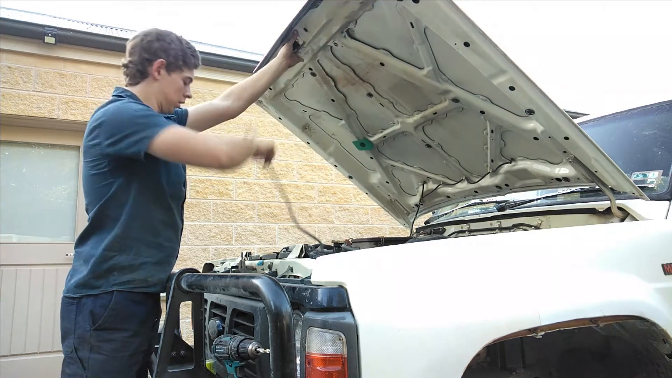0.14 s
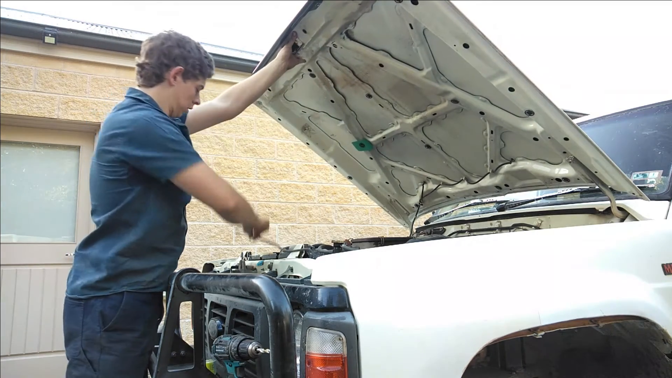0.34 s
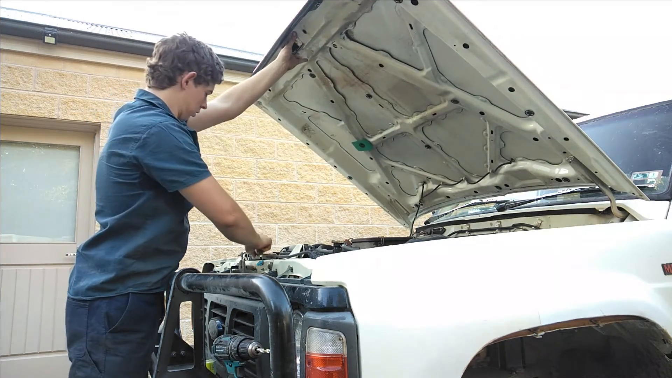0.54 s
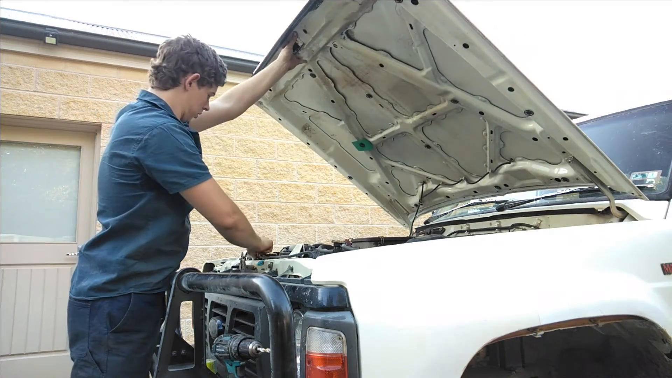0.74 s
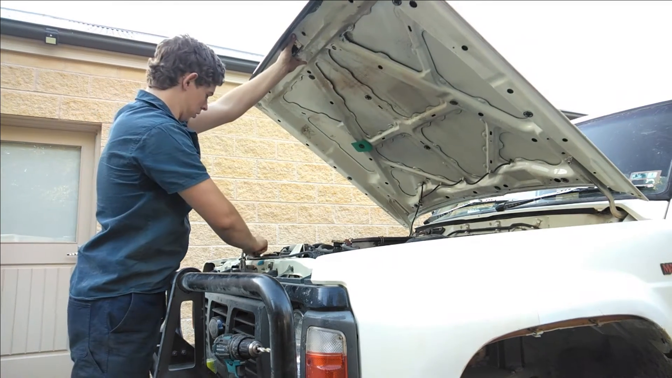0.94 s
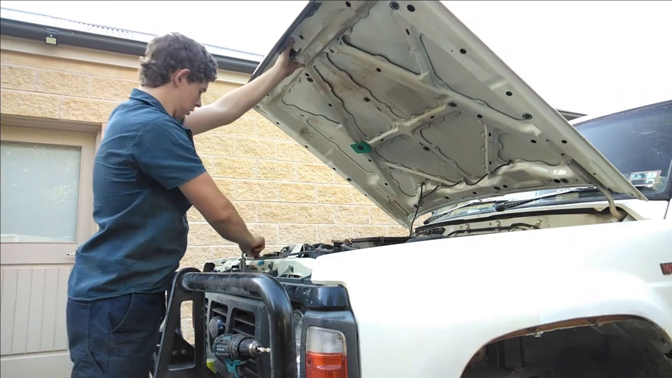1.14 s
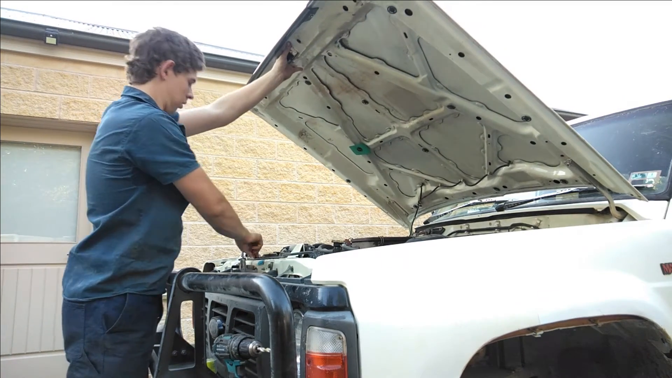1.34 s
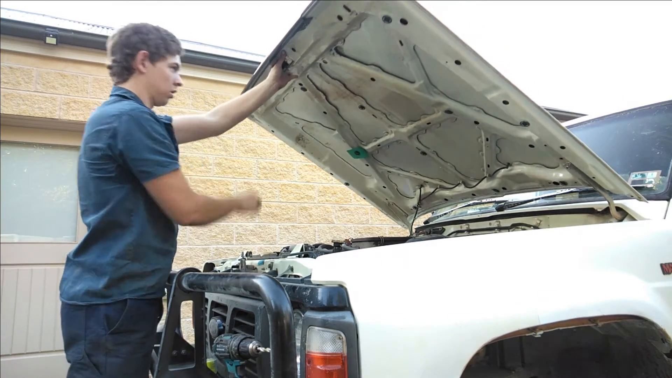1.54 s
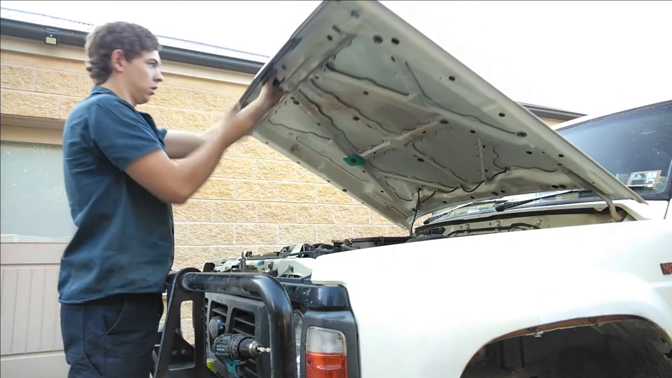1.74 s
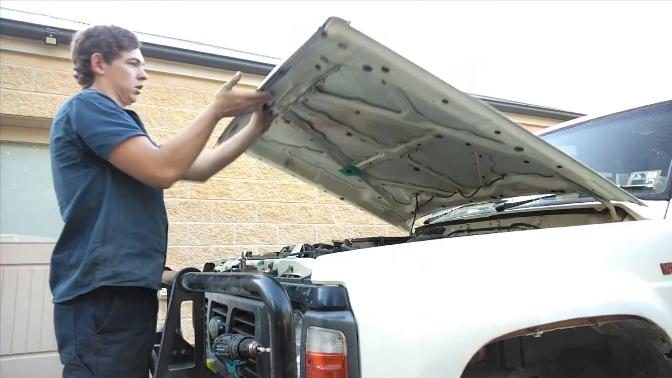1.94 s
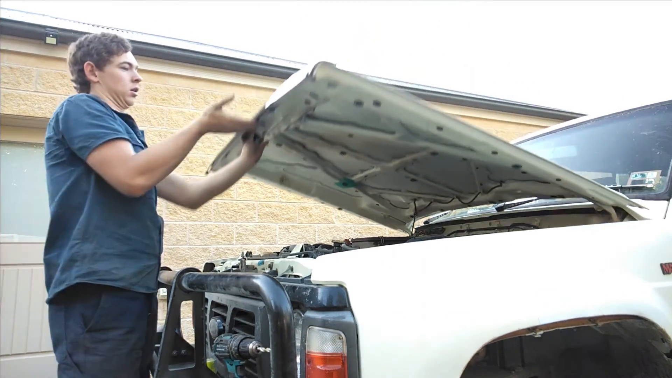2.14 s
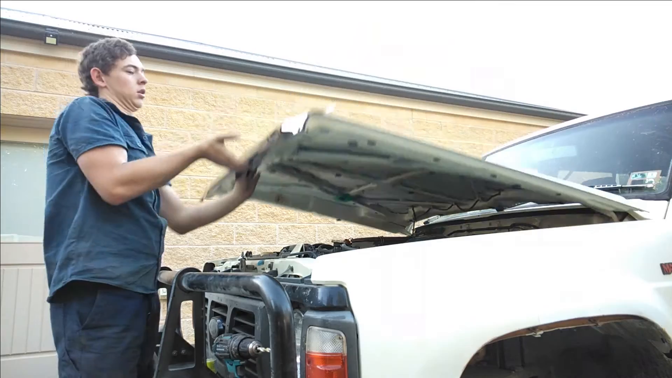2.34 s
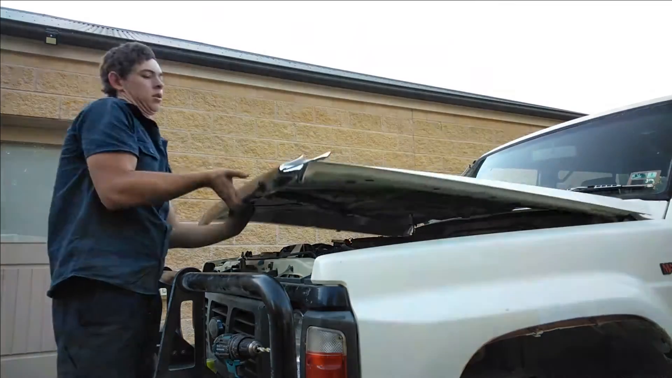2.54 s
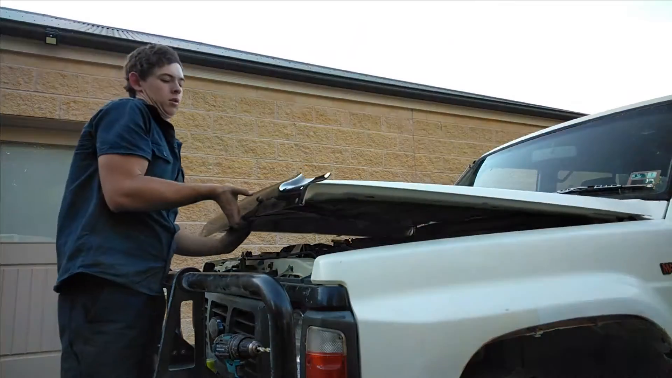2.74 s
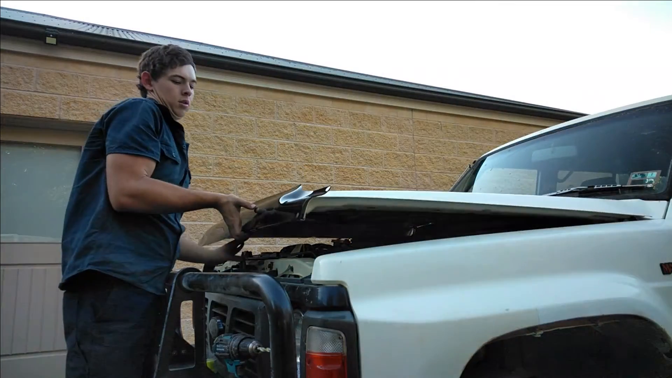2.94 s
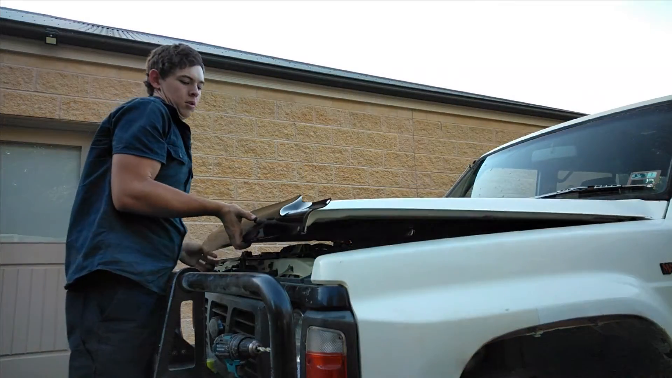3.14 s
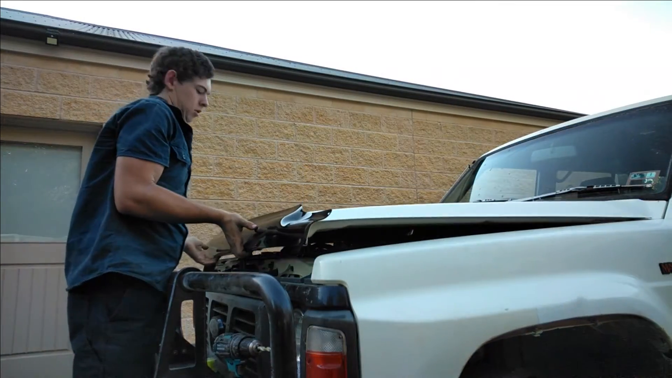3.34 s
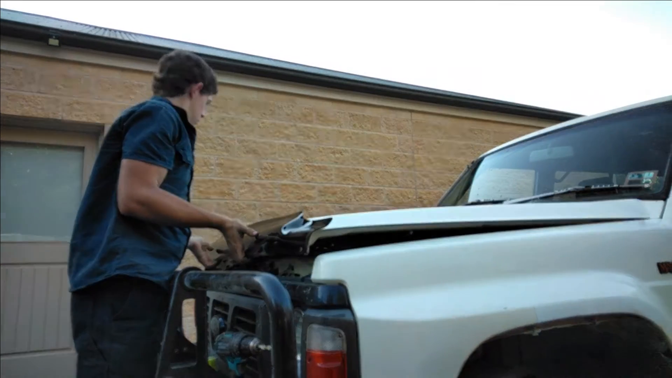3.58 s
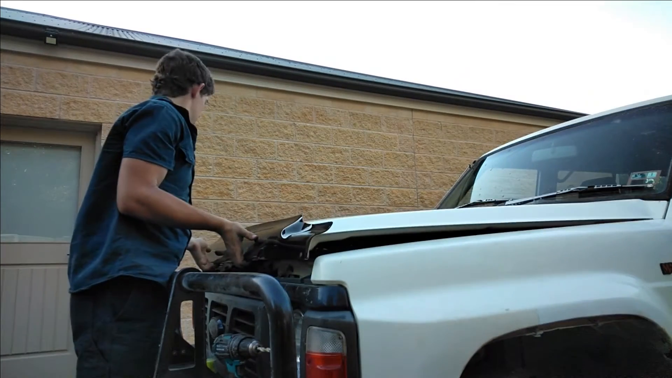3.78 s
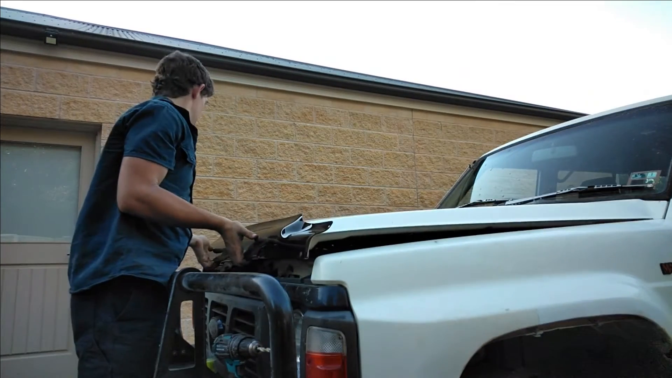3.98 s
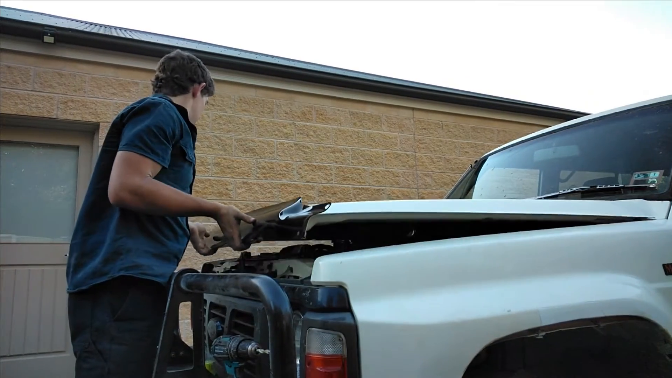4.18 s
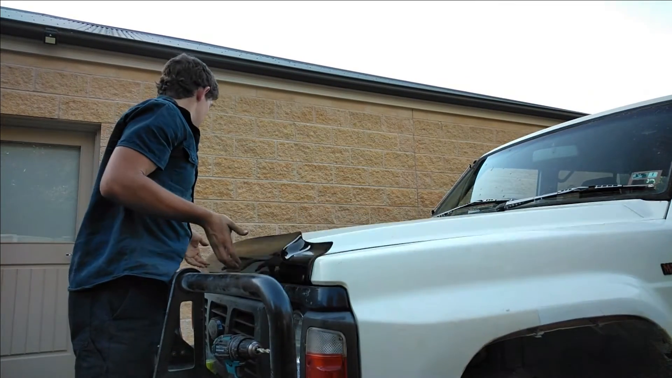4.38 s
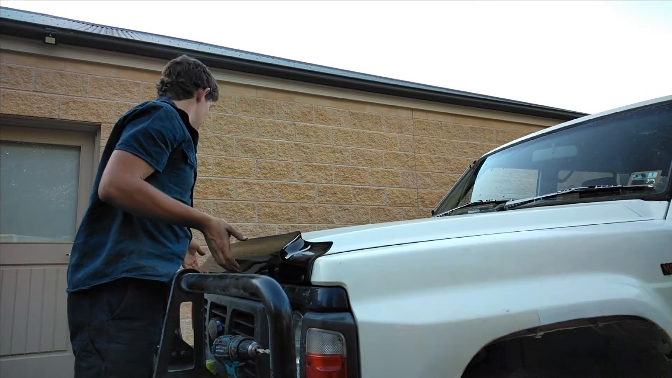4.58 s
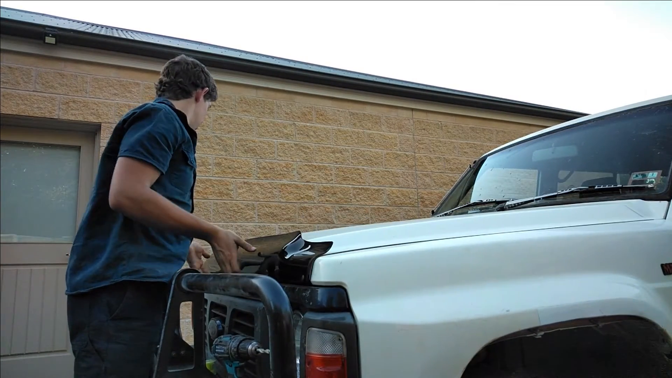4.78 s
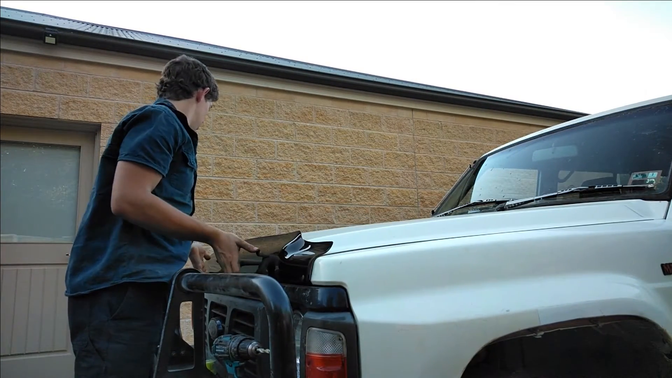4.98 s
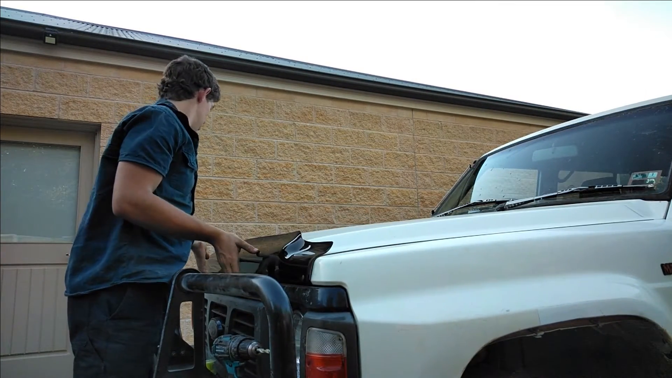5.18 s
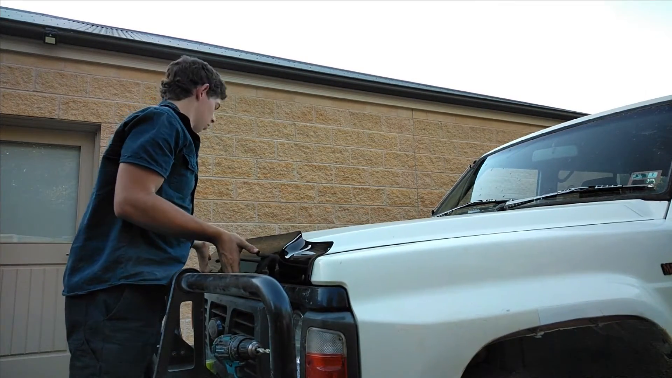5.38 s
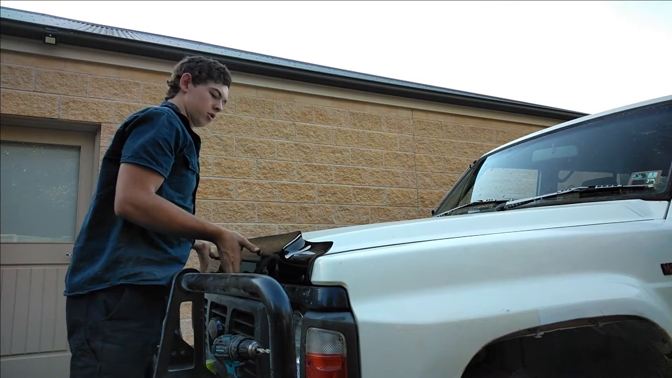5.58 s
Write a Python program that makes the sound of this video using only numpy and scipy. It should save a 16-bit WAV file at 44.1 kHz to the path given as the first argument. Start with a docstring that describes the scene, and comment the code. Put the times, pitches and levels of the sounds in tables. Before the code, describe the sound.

A metal prop rod snaps into its clip, then a steel car bonnet is lowered with light rattles and slammed shut outdoors.

```python
"""Steel bonnet shut on a driveway.

The prop rod folds down, squeaks in its pivot and snaps into its clip. The bonnet knocks on its hinges as
it is lowered and touches the catch, then is slammed: the striker clangs, the latch snaps, the panel booms.
Each blow is decaying noise (crowded modes) plus ringing sines (clear modes). Birds call far off over
quiet air; a brick wall, the garage door and the paving echo."""
import sys
import numpy as np
from scipy import signal
from scipy.fft import rfft, irfft
from scipy.io import wavfile
from scipy.ndimage import uniform_filter1d

SR = 44100
rng = np.random.default_rng(int(sys.argv[2]) if len(sys.argv) > 2 else 0)


def wav_record(signal):
    """Record a signal, one row per channel, as 16-bit PCM in the file named by sys.argv[1]."""
    frames = np.transpose(np.atleast_2d(signal))
    bounded = np.clip(frames, -1, 1)
    # unit amplitude maps onto the largest positive 16-bit level
    quanta = np.round(bounded * 32767).astype(np.int16)
    wavfile.write(sys.argv[1], SR, quanta)


N = 247401
TIME = np.arange(N) / SR


def from_db(db):
    return 10 ** (np.asarray(db) / 20)


def unit_rms(x):
    return x / np.sqrt(np.mean(x ** 2) + 1e-20)


def at_hz(points, hz):
    """Interpolate rows of (f/Hz, value) over log frequency."""
    known_hz, value = np.transpose(points)
    return np.interp(np.log(np.maximum(hz, 1)), np.log(known_hz), value)


def add(out, start_s, sound):
    at = round(start_s * SR)
    out[at:at + len(sound)] += sound[:N - at]


def coloured(white, colour):
    """Shape white noise at constant power."""
    hz = np.fft.rfftfreq(len(white), 1 / SR)
    return irfft(rfft(white) * unit_rms(from_db(at_hz(colour, hz))), len(white))


def crowded_modes(noise, decay, shelves=((1, 0), (SR, 0))):
    """Each band of the noise swells quickly and dies at its own rate."""
    t, hz = TIME[:len(noise)], np.fft.rfftfreq(len(noise), 1 / SR)
    spectrum = rfft(noise) * from_db(at_hz(shelves, hz))
    centres_hz = [row[0] for row in decay]
    out = 0
    for (centre_hz, t60_s), weights in zip(decay, np.eye(len(decay))):
        band = irfft(spectrum * at_hz(list(zip(centres_hz, weights)), hz), len(noise))
        attack = 1 - np.exp(-2 * t * min(centre_hz, SR / 20))
        out = out + band * attack * np.exp(-np.log(1000) * t / t60_s)
    return out


def mode(times_s, levels_db, hz, t60_s):
    """One resonance, rung by a click at each contact."""
    clicks = np.zeros(N)
    clicks[np.round(times_s * SR).astype(int)] = from_db(levels_db)
    r, w = np.exp(-np.log(1000) / (t60_s * SR)), 2 * np.pi * hz / SR
    return signal.lfilter([0, np.sin(w)], [1, -2 * r * np.cos(w), r * r], clicks + 1e-18)


def with_force(hits, bass_db, bass_per_softness):
    """Turn hardness (treble/dB) into a force spectrum: softer contacts last longer and gain bass."""
    blows = []
    for start_s, level_db, treble_db in hits:
        force = [(150, bass_db - bass_per_softness * treble_db), (450, 0), (1100, 0), (3800, treble_db)]
        blows.append((start_s, level_db, force))
    return blows


def struck(blows, colour, decay, shared_power, rise_s, crack_db, crack_s, size=32768):
    """Crowded modes of one steel part; its blows share some of them."""
    out, t = np.zeros(N), TIME[:size]
    shared = rng.standard_normal(size)
    # contact builds up, loudest before the blow spreads through the metal
    crack = (1 - np.exp(-t / rise_s)) * (1 + from_db(crack_db) * np.exp(-t / crack_s))
    for start_s, level_db, force in blows:
        white = np.sqrt(shared_power) * shared + np.sqrt(1 - shared_power) * rng.standard_normal(size)
        body = crowded_modes(coloured(white, colour), decay, force)
        add(out, start_s, from_db(level_db) * crack * body)
    return out


def clear_modes(blows, modes, drive_db, spread_db):
    """Each blow rings the part's clearest modes; neighbours swing opposite ways."""
    times_s, levels_db, forces = zip(*blows)
    force_db = np.array([at_hz(force, np.array(modes)[:, 0]) for force in forces])
    force_db += spread_db * rng.standard_normal(force_db.shape)
    out = np.zeros(N)
    for k, (hz, mode_db, t60_s) in enumerate(modes):
        strength_db = force_db[:, k] + levels_db + mode_db + drive_db
        out += (-1) ** k * mode(np.array(times_s), strength_db, hz, t60_s)
    return out


# outdoor background spectrum: f/Hz, relative density/dB
AIR_COLOUR = [(20, -13.5), (50, 0.5), (80, -12.5), (140, -13.5), (220, -17.5), (330, -21), (480, -15.5),
              (800, -19), (1400, -23.5), (2200, -27.5), (3800, -32), (6500, -32), (10000, -34.5),
              (15500, -32.5)]


def air(level_db=-52.5):
    """Steady, quiet outdoor noise."""
    return from_db(level_db) * coloured(rng.standard_normal(N), AIR_COLOUR)


# echo spectrum: f/Hz, relative level/dB
YARD_COLOUR = [(50, 0.5), (300, 5), (1500, -0.5), (3500, 1), (5000, 2), (6500, 4), (9000, 2.5), (15000, -6)]
# echo decay: f/Hz, t60/s
YARD_DECAY = [(100, 0.836), (500, 0.595), (2000, 0.803), (6500, 0.49), (13000, 0.34)]


def yard(x, delay_s=0.015):
    """Scattered echoes from wall, garage door and paving."""
    response = crowded_modes(coloured(rng.standard_normal(SR), YARD_COLOUR), YARD_DECAY)
    response /= np.sqrt(np.sum(response ** 2))
    out = np.zeros(N)
    add(out, delay_s, signal.fftconvolve(x, response)[:N])
    return out


# two-note chirps: t/s, f/Hz, first level/dB, second level/dB
CHIRPS = [(2.663, 3642, -50, -49.5), (2.837, 3827, -42, -51.5), (3.209, 3600, -57.5, -56.5)]
# plain whistles, farther off: t/s, f/Hz, level/dB
WHISTLES = [(1.734, 1510, -57), (2.554, 4292, -64), (2.78, 2710, -60), (3.138, 2500, -61)]


def birds(whistle_s=0.083, whistle_fall=0.028, note_s=0.05, note_step_s=0.047,
          note_fall=0.132, note_flick=0.156, warble=0.022):
    """Slightly hoarse falling notes; a chirp's first drops steeply in and out, its second is smooth."""
    out = np.zeros(N)
    waver = unit_rms(uniform_filter1d(rng.standard_normal(N), size=40))
    notes = [(start_s, whistle_s, hz, whistle_fall, 0, db) for start_s, hz, db in WHISTLES]
    for start_s, hz, first_db, second_db in CHIRPS:
        notes.append((start_s, note_s, hz, note_fall, note_flick, first_db))
        notes.append((start_s + note_step_s, note_s, hz, note_fall, 0, second_db))
    for start_s, length_s, pitch_hz, fall, flick, level_db in notes:
        t = TIME[:round(length_s * SR)]
        progress = t / length_s
        ends = np.exp(-t / 0.002) - np.exp((t - length_s) / 0.005)
        glide = 1 - fall * progress ** 1.674 + flick * ends
        hz = pitch_hz * glide * (1 + warble * np.interp(start_s + t, TIME, waver))
        swell = np.sqrt(np.abs(np.sin(np.pi * progress))) * np.exp(-0.42 * progress)
        add(out, start_s, 2 * from_db(level_db) * swell * np.sin(2 * np.pi * np.cumsum(hz) / SR))
    return out


# spells of rattling as the bonnet moves: start t/s, end t/s, level/dB
RATTLES = [(1.97, 2.14, -55.5), (2.40, 2.90, -52), (3.86, 4.16, -47)]


def rattle_hits(gap_s=0.045, spread_db=2.5, hardness_db=-8):
    """Loose parts touch softly at uneven intervals."""
    hits = []
    for start_s, end_s, level_db in RATTLES:
        for k, (late, strong) in enumerate(rng.uniform(-1, 1, size=(32, 2))):
            hit_s = start_s + gap_s * (k + 0.5 + 0.5 * late)
            if hit_s < end_s:
                hits.append((hit_s, level_db + spread_db * strong, hardness_db))
    return hits


# rubbing in the pivot: f/Hz, relative density/dB
RASP_COLOUR = [(150, -28), (450, -6), (900, 2.5), (1800, -21.5), (3000, -28), (6000, -58)]
# free slips that flare the squeak: t/s, level/dB
SLIPS = [(0.621, -29), (0.643, -32.5)]


def pivot_squeak(start_s=0.5763, pitch_hz=891.7, jitter=0.02, level_db=-41, octave_db=-20, rasp_db=-5,
                 attack_s=0.007, hold_s=0.0626, release_db_per_s=180, slip_s=0.00534):
    """The steel rod sticks and slips unsteadily in its rubber pivot, over a rasp of rubbing."""
    t = TIME - start_s
    waver = unit_rms(uniform_filter1d(rng.standard_normal(N), size=200))
    phase = 2 * np.pi * np.cumsum(pitch_hz * (1 + jitter * waver)) / SR
    tone = np.sqrt(2) * (np.sin(phase) + from_db(octave_db) * np.sin(2 * phase))
    release_db = release_db_per_s * np.maximum(t - hold_s, 0)
    envelope = np.clip(t / attack_s, 0, 1) * from_db(level_db - release_db)
    envelope += sum(from_db(db) * np.exp(-((TIME - at_s) / slip_s) ** 2) for at_s, db in SLIPS)
    rasp = uniform_filter1d(envelope, size=2200) * coloured(rng.standard_normal(N), RASP_COLOUR)
    return envelope * tone + from_db(rasp_db) * rasp


# rod on seat and clip: t/s, level/dB, hardness/dB
ROD_HITS = [(0.240, -43, -4.5), (0.287, -31, -32), (0.315, -41, -46), (0.596, -35, -25.5),
            (0.652, -49.5, -6), (0.795, -44, -15.5), (1.112, -35, -13.5), (1.1703, -13.5, 6),
            (1.1765, -12.5, -0.5), (1.194, -12, -11.5), (1.445, -32.5, -14)]
# crowded rod modes: f/Hz, relative density/dB
ROD_COLOUR = [(40, -24.5), (160, -17), (270, -2.5), (420, -0.5), (650, 0), (1200, 2), (2300, -3),
              (3800, -6.5), (5100, -12), (6600, -1), (8300, -15.5), (10500, -11), (13000, -16.5),
              (15000, -5.5)]
# their decay: f/Hz, t60/s
ROD_DECAY = [(100, 0.41), (400, 0.3), (1300, .2), (3500, 0.2), (5000, 0.15), (6500, .13), (9000, 0.067),
             (15000, .11)]
# clear rod modes: f/Hz, level/dB, t60/s
ROD_MODES = [(205, -28.5, 0.84), (328, -25.5, 0.8), (423, -8, 0.43), (457.5, -12.5, 0.23), (942, -11, 0.22),
             (1250, -4.5, 0.17), (1383, -8.5, 0.21), (1634, -17, 0.356), (1782, -8, 0.147),
             (2492, -18, 0.099), (2838, -7.5, 0.17), (3307, -19, 0.17), (3789, -5, 0.099),
             (6100, -15.5, 0.1987), (6460, -14, .22), (6766, -4.5, 0.083)]


def prop_rod():
    """The rod rings as it taps its seat and snaps into its clip."""
    blows = with_force(ROD_HITS, bass_db=-1.5, bass_per_softness=0.25)
    clatter = struck(blows, ROD_COLOUR, ROD_DECAY,
                     shared_power=0.21, rise_s=0.000225, crack_db=-32.5, crack_s=0.0025)
    return from_db(2.0) * clatter + clear_modes(blows, ROD_MODES, drive_db=-6, spread_db=1)


# hinge and catch knocks: t/s, level/dB, hardness/dB
KNOCKS = [(1.424, -41, 14.5), (2.447, -38, 6.5), (2.501, -41.5, 1.5), (2.541, -40, -1.5), (2.613, -35.5, 0),
          (2.706, -38, 0.5), (2.786, -42, -10.5), (3.05, -37.5, -6.5), (3.277, -41, 5.5), (3.355, -41.5, 3),
          (3.593, -32, 2.5), (3.837, -29, -20), (3.938, -31, 0.5), (4.005, -34.5, -0.5),
          (4.098, -38.5, -8.5), (4.316, -35, -3), (4.825, -41, -18), (5.058, -48, -11.5),
          (5.326, -45.5, -17)]
# crowded modes of a knock: f/Hz, relative density/dB
KNOCK_COLOUR = [(35, -10), (75, 0.5), (160, -4), (280, -5.5), (560, 4), (850, -0.5), (1650, -0.5),
                (2700, -10), (4200, -26), (6600, -21), (8500, -36), (13000, -28.5), (15500, -20)]
# their decay: f/Hz, t60/s
KNOCK_DECAY = [(60, 0.56), (160, 0.644), (500, 0.4), (1500, 0.18), (4000, 0.16), (6500, 0.19),
               (12000, 0.047)]
# clear panel modes, also rung by the slam: f/Hz, level/dB, t60/s
PANEL_MODES = [(21.95, -30, 2.4), (75.7, -13.5, 0.4), (132, -16, 0.68), (146, -17.5, 0.36),
               (166.4, -4.5, 0.58), (319, -17, 0.279), (409.2, -12, 0.162), (492, -8.5, 0.237),
               (520.4, -8.5, 0.273), (596, -10.5, .28), (652.7, -16, 0.49), (732, -19.5, 0.33),
               (772, -20.5, 0.25), (1004, -17, 0.266), (1210, -20, 0.21), (1392, -21.5, 0.31),
               (1762, -22, 0.21), (2220, -20, .24), (2435.5, -24.5, .22)]


def bonnet_knocks(rattles):
    """Hinges, catch and loose parts ring the panel as it moves, comes down and settles."""
    blows = with_force(KNOCKS + rattles, bass_db=1, bass_per_softness=0.35)
    clunks = struck(blows, KNOCK_COLOUR, KNOCK_DECAY,
                    shared_power=0.43, rise_s=0.0007, crack_db=-10, crack_s=0.013)
    return from_db(0.9) * clunks + clear_modes(blows, PANEL_MODES, drive_db=-8.5, spread_db=1)


# striker chatter on the catch: t/s, level/dB
STRIKER_HITS = [(4.3830, -5.5), (4.3844, -9.5), (4.387, -3.5)]
# striker modes: f/Hz, level/dB, t60/s
STRIKER_MODES = [(941, -14, 0.13), (1166, 4.5, 0.0258), (1276, -20.5, 0.12), (1340, -13.5, .08),
                 (1741, -18, .03)]


def striker(low_cut_hz=800):
    """A short, hard clang on the catch, with no bass beneath it."""
    times_s, levels_db = np.transpose(STRIKER_HITS)
    clang = sum(from_db(db) * mode(times_s, levels_db, hz, t60_s) for hz, db, t60_s in STRIKER_MODES)
    return signal.sosfilt(signal.butter(3, low_cut_hz, "high", fs=SR, output="sos"), clang)


def latch_hits(land_s=4.3825, land_db=-12.5, hardness_db=-3, steps=4, gap_s=0.02, gap_ratio=0.8,
               step_db=-9, louder_db=0.7, harder_db=1.33):
    """The striker lands, then is forced down the latch in ever quicker, harder steps."""
    hits, hit_s = [(land_s, land_db, hardness_db)], land_s
    for k in range(steps):
        hit_s += gap_s * gap_ratio ** k
        hits.append((hit_s, step_db + louder_db * k, hardness_db + harder_db * (k + 1)))
    return hits


# panel on its two rubber stops, then its rebound: t/s, level/dB, hardness/dB
STOP_HITS = [(4.457, -10.5, -23), (4.466, -10, -23), (4.487, -11, -9.5)]
# crowded modes of the slam: f/Hz, relative density/dB
SLAM_COLOUR = [(30, -8.5), (80, -1), (145, 6), (225, -4), (320, -2.5), (520, 1), (850, -0.5), (1250, -1),
               (2200, -6.5), (4300, -18), (6700, -12.5), (8500, -24), (12500, -25), (15200, -12.5)]
# their decay: f/Hz, t60/s
SLAM_DECAY = [(40, 0.66), (140, 0.4), (300, 0.35), (600, 0.332), (1500, 0.17), (4000, 0.2), (6500, 0.15),
              (14000, 0.11)]


def bonnet_slam():
    """Blows from the latch and the rubber stops set the panel booming."""
    blows = with_force(latch_hits() + STOP_HITS, bass_db=-4, bass_per_softness=0.56)
    crash = struck(blows, SLAM_COLOUR, SLAM_DECAY,
                   shared_power=0.1, rise_s=0.0014, crack_db=-11.5, crack_s=0.0027)
    return from_db(0.96) * crash + clear_modes(blows, PANEL_MODES, drive_db=-5.5, spread_db=0)


def scene():
    """Steel parts close by, birds far off, echoes and air; mono."""
    rattles = rattle_hits()
    rod = prop_rod()
    knocks = bonnet_knocks(rattles)
    slam = bonnet_slam() + striker()
    squeak = pivot_squeak()
    song = birds()
    echoes = yard(from_db(-23.5) * rod + from_db(-16.5) * knocks + from_db(-18) * slam
                  + from_db(-17.5) * squeak + from_db(-12.5) * song)
    return (rod + knocks + slam + squeak + song + echoes + air())[None]


def gain_control(x, limit_db=-0.5, release_db_per_s=3.5, attack_s=0.0048):
    """Peaks over the limit pull the gain down quickly; it creeps back up."""
    over_db = np.maximum(20 * np.log10(np.abs(x) + 1e-9) - limit_db, 0)
    ramp_db = release_db_per_s * TIME
    held_db = np.maximum.accumulate(over_db + ramp_db, axis=-1) - ramp_db
    pole = np.exp(-1 / (attack_s * SR))
    return x * from_db(-signal.lfilter([1 - pole], [1, -pole], held_db))


def record(dry, cutoff_hz=16000):
    """Gain control, clipping of what slips past it, steep top cut."""
    clipped = np.clip(gain_control(dry), -1, 1)
    return signal.sosfilt(signal.ellip(10, 0.2, 80, cutoff_hz, fs=SR, output="sos"), clipped)


dry = scene()
out = record(dry)
wav_record(out)
```